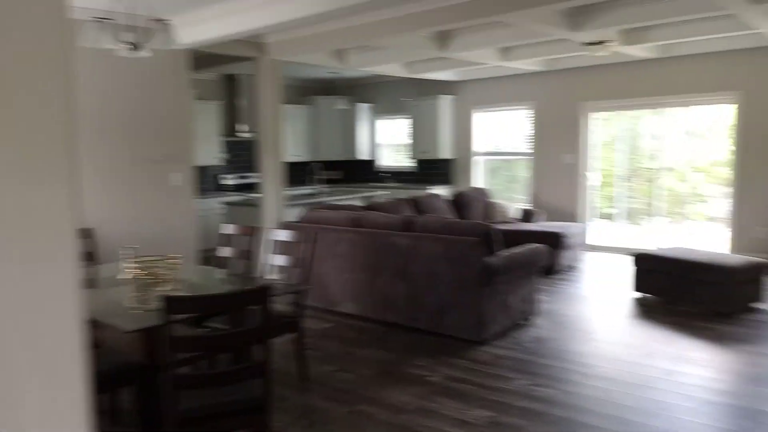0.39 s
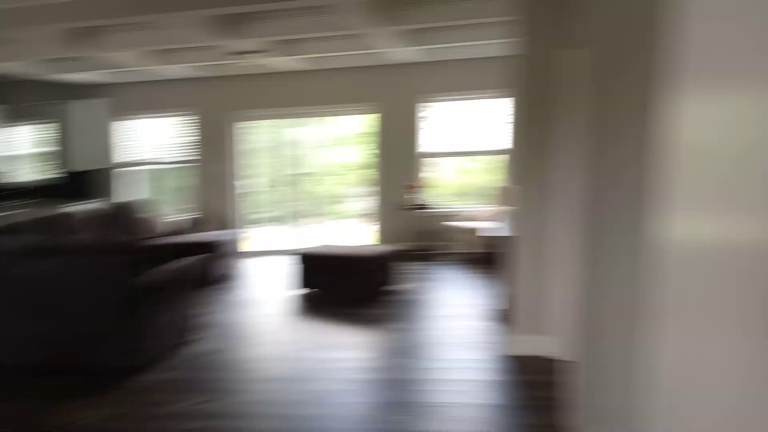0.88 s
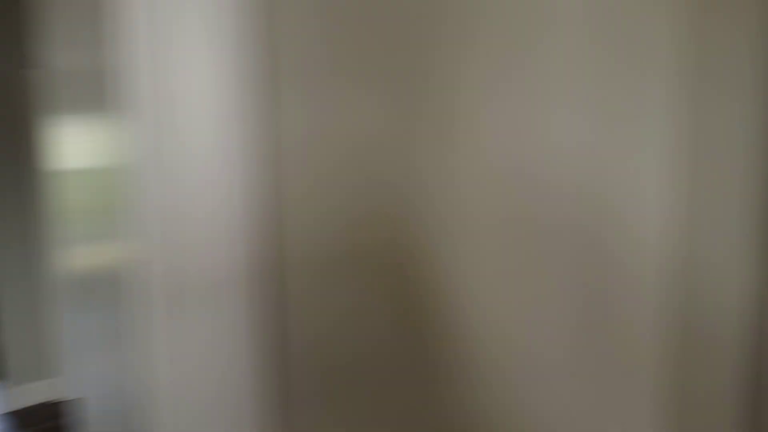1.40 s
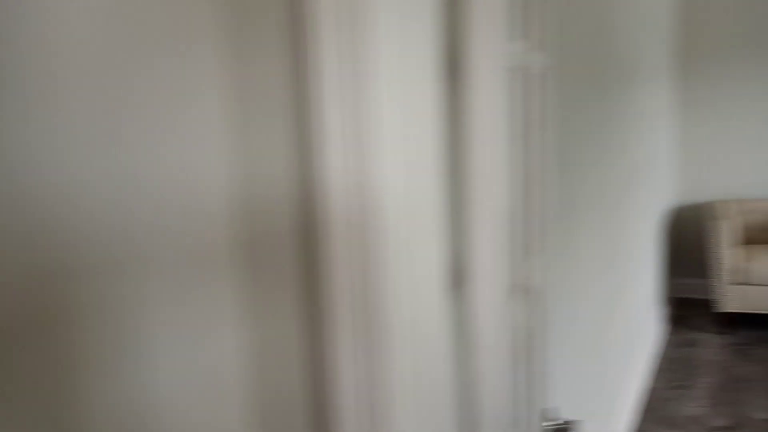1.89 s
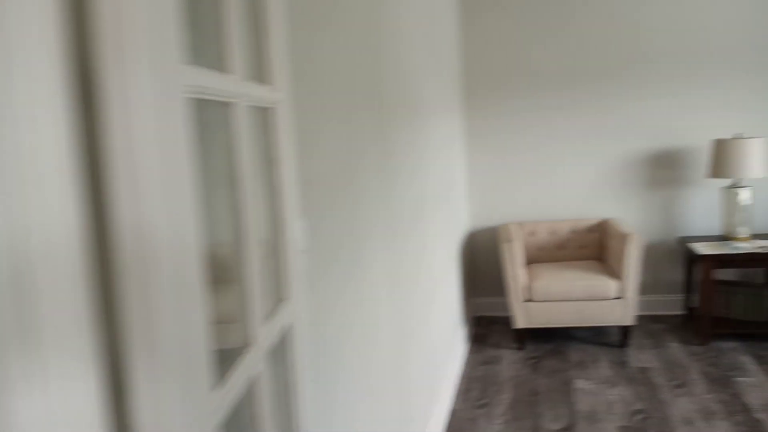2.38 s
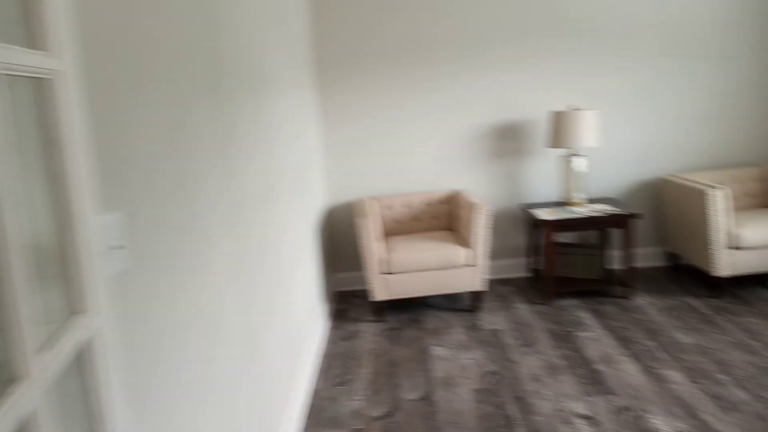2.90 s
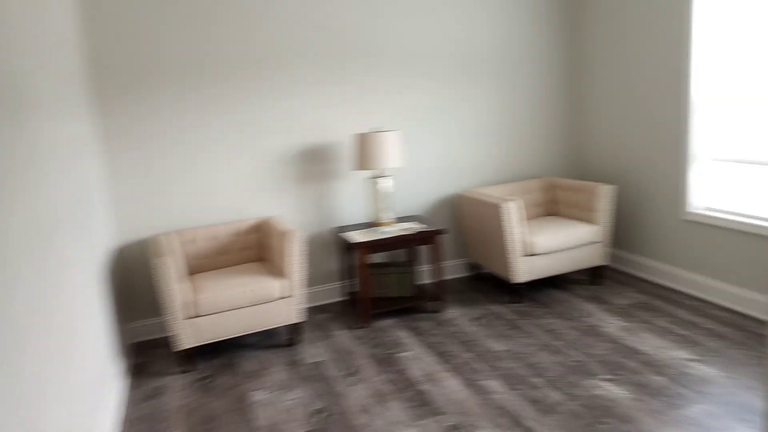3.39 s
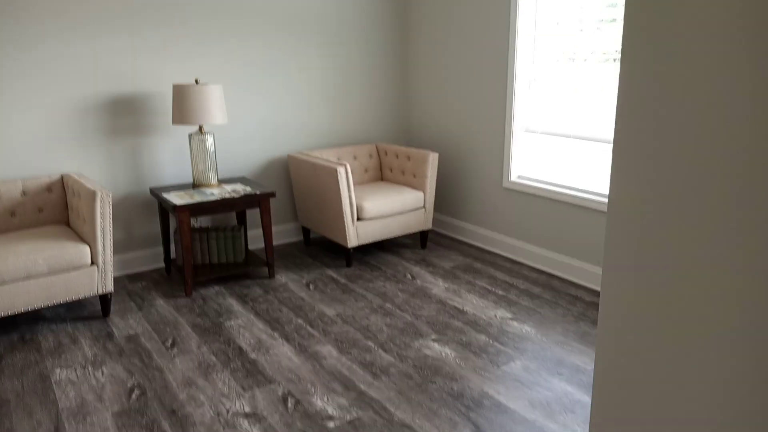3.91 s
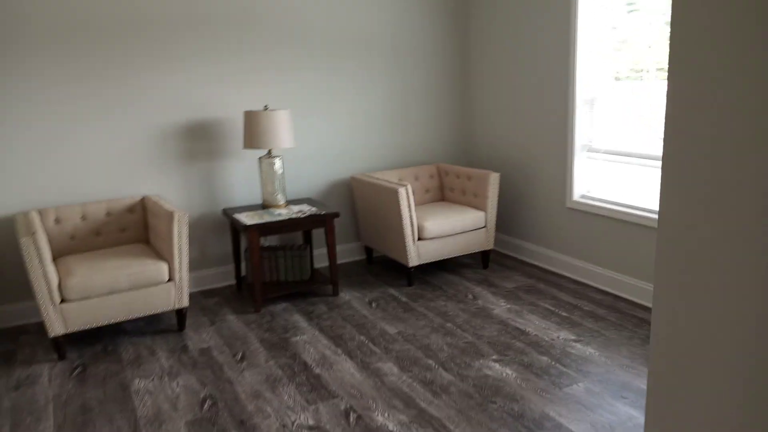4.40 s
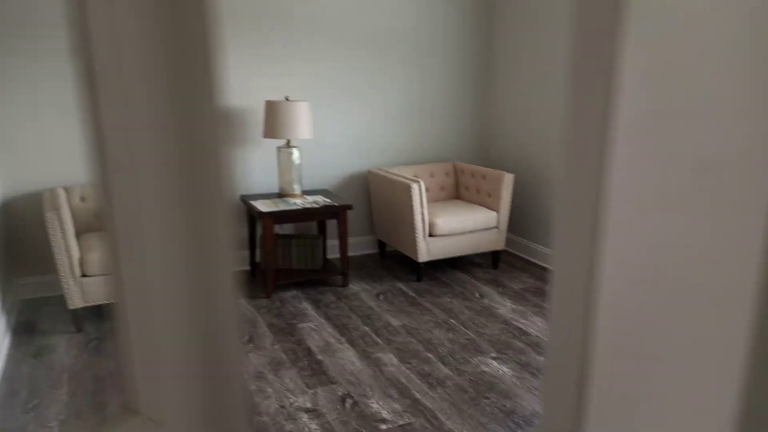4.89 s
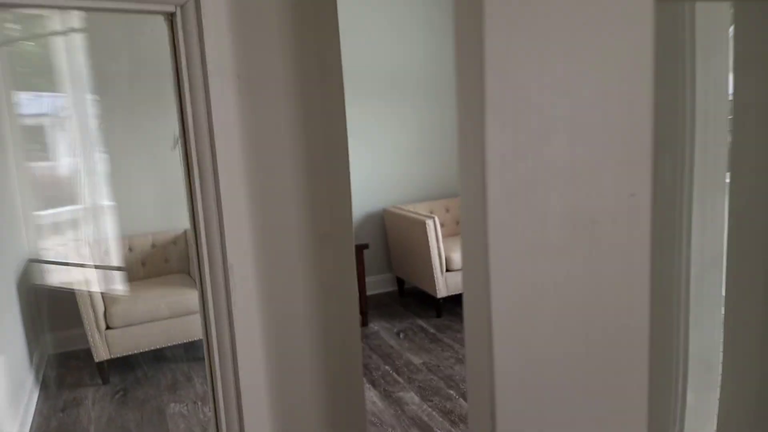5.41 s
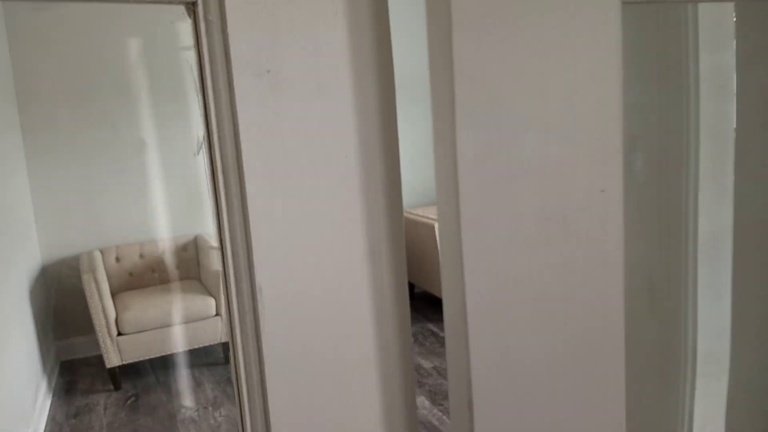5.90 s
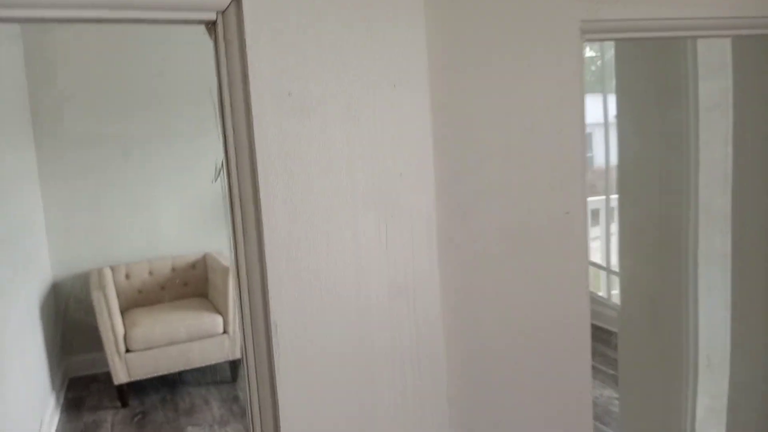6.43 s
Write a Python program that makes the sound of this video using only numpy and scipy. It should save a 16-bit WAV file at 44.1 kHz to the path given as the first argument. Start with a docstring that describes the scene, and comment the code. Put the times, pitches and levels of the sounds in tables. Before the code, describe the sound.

Close handheld microphone in a bare, slightly echoing house. Soft steps and scuffs on a hard floor with rustling clothes and a few bright key clinks. Then door hardware rattles in sharp ticks, with wooden thumps and heavier rustling, loudest around the middle and later part. It falls nearly silent, a hinge squeaks thinly, and the door knocks softly on its frame.

```python
"""Steps on a hard floor in a bare house, rustling clothes and soles, keys touching now and then; a light door
is pulled shut: its hardware ticks, its hinge squeaks, it knocks on the frame. Low hum and room air lie below.
Rustle and ticks are shaped noise; thuds and keys are decaying sines with noise; squeaks are unsteady sines;
groans and air are resonant noise; the door is a bank of resonances. A small microphone colours the treble."""
import sys
import numpy as np
from scipy import signal
from scipy.fft import rfft, irfft, next_fast_len
from scipy.io import wavfile

SR = 44100
rng = np.random.default_rng(int(sys.argv[2]) if len(sys.argv) > 2 else 0)


def wav_out(sig):
    """Save sig, one row per channel (or a flat mono array), as 16-bit PCM at SR to the path in sys.argv[1]."""
    wavfile.write(sys.argv[1], SR, np.round(np.clip(np.atleast_2d(sig).T, -1, 1) * 32767).astype(np.int16))


def attenuation_scalar(level_db):
    """Turn a level in dB into a linear amplitude multiplier (20 dB per decade)."""
    decades = np.asarray(level_db, float) / 20
    return 10 ** decades


N = 288414

# Single rubs of cloth and soles. Each row: time of the peak in seconds, peak in dB before the weight's share,
# 20 dB rise in seconds, 20 dB fall in seconds before the stretch, weight (extra body) in dB.
RUBS = [(.05, -46, 0.11, 0.17, -8), (.32, -53, 0.02, .3, -12), (.41, -55, 0.018, 0.34, -10.5),
        (.63, -59, 0.08, 0.5, -19), (.705, -46, 0.0097, 0.3, -6.5), (.872, -51.5, 0.022, 0.53, -27),
        (1.10, -51, 0.08, 0.42, -1), (1.37, -57, 0.024, -0.16, -23), (1.712, -56, 0.0095, 0.53, -13.5),
        (1.82, -61, 0.033, -0.18, -3), (2.45, -55, .12, 0.68, -7.5), (2.812, -53, 0.013, 0.23, -26),
        (3.05, -53, 0.1, 0.27, -24), (3.28, -56.5, 0.066, 0.63, -1), (3.39, -49, 0.23, 1, -5.5),
        (3.70, -40, 0.027, 0.26, -16), (3.75, -37, 0.023, 0.326, -5), (3.97, -46, 0.066, 0.22, -2),
        (4.20, -40.5, 0.12, 0.37, -13), (4.31, -40.5, 0.086, 0.3547, -6.5), (4.48, -46, 0.028, 0.2, 1),
        (4.55, -36.5, 0.039, 0.2929, -7), (4.84, -39, 0.038, 0.3979, -6), (4.93, -35, 0.16, 0.32, -9.5),
        (5.03, -38, 0.18, 0.1454, -3), (6.37, -63.5, 0.035, 0.22, 4)]
# Faint rustle under the rubs. Each row: time in seconds, level in dB before the weight's share, weight in dB.
SHUFFLE = [(0, -57.5, -4), (.3, -57, -2.5), (.6, -63, -24), (1.0, -75.5, -19), (1.35, -57, -6),
           (1.55, -69.5, -19), (2.1, -75.5, -5), (2.38, -67, -21), (2.9, -61, -11.5), (3.2, -65, 2),
           (3.65, -64.5, -2), (4.05, -55.5, -1), (4.75, -56, -3), (5.15, -61, 6), (5.25, -69, 10),
           (5.45, -89.5, 14), (6.05, -88.5, 9), (6.17, -88, 15.5), (6.3, -92, 4), (6.54, -79, -2)]
# Pitch strips of the rustle. Each row: low edge in Hz, high edge in Hz, gain in dB,
# share of the weight that it follows (ratio), stretch of the fall (ratio).
RUSTLE_STRIPS = [(370, 1190, -12.5, 0.21, 1.38), (1186, 2217, -0.5, 1.02, 0.75),
                 (2315, 5320, 0.5, 0.31, 0.61), (5430, 8600, -0.7, 0.023, 0.6),
                 (8820, 15150, -5.5, -.1, 0.57)]
# Rustle colour as the walker turns. Each row: time in seconds, gain of the middle strip in dB,
# gain of the top strip in dB.
RUSTLE_COLOUR = [(0, -0.3, 3), (.4, 0.5, 1), (.58, -2.5, 0), (.72, 2.5, 0.5), (.98, 1, -5), (1.1, 1, -0.5),
                 (1.4, 0.9, 0.5), (1.55, -7, -4.5), (1.8, 1.5, -2.5), (2.1, -6.5, 1.5), (2.5, 3.5, 2),
                 (3.0, 0, 1.5), (3.4, 0.5, -1), (3.65, 2, -3), (3.72, 1, 0), (4.0, 2, 3.5),
                 (4.45, 1.5, 0.1), (5.05, 0, 2), (5.22, 3.5, -4.5), (5.5, -1, 0.1), (6.54, 1.8, 1)]
# Heels, scuffs, knocks on boards and frame. Each row: start in seconds, peak in dB, pitch in Hz, T60 in seconds,
# spread of the noise to either side in octaves.
THUDS = [(.019, -36, 177, 0.17, 0.36), (.207, -44.5, 190, 0.12, 0.43), (0.329, -48, 260, 0.22, 0.43),
         (.701, -35, 250, 0.042, 0.54), (.711, -27.5, 190, 0.03, 0.55), (.709, -36, 526, 0.17, 0.32),
         (.765, -34.5, 248, 0.19, 0.8), (.80, -44, 176, 0.061, 0.43), (1.08, -46, 190, 0.22, 0.37),
         (1.16, -44.5, 236, 0.21, 0.24), (1.708, -61, 2900, 0.16, 0.15), (1.79, -61, 2024, 0.41, 0.082),
         (1.794, -45, 150, 0.12, 0.32), (2.268, -53, 795, 0.11, 0.6), (2.42, -51.5, 2030, 0.24, 0.09),
         (3.07, -45.5, 494, 0.3, 0.76), (3.418, -36, 1220, 0.035, 0.39), (3.717, -32, 1056, 0.28, 0.73),
         (4.298, -28, 1632, 0.44, 0.13), (4.322, -34, 990, 0.21, 0.19), (4.33, -33.5, 530, 0.16, 0.8),
         (4.482, -31.5, 381, 0.15, 0.46), (4.503, -30, 193, 0.2, 1.34), (4.54, -31, 330.5, 0.18, 1),
         (4.545, -32.5, 693, 0.19, 0.23), (4.555, -36, 1051, 0.3, 0.13), (5.815, -46.5, 1360, 0.051, 0.24),
         (5.817, -66, 2810, 0.11, 0.17), (5.818, -68, 4460, .12, 0.075)]
# Dry ticks of soles, folds and door hardware. Each row: start in seconds, peak in dB, centre in Hz,
# gain of the broad part in dB.
TICKS = [(.699, -36, 6960, -10), (1.7065, -53, 6800, -18), (2.268, -59, 1100, -6), (2.4204, -41, 2060, 14),
         (2.5227, -35, 6650, 14), (2.813, -37, 4900, -32), (3.071, -39, 2980, -17),
         (3.4176, -27, 1720, -7.5), (3.5029, -34, 3540, -16), (3.691, -25.5, 6200, -1.5),
         (3.6978, -24.5, 7190, -8), (3.7096, -22.5, 2880, -15.5), (3.732, -20.5, 5800, 1),
         (3.7406, -20.5, 2820, 0), (3.754, -20.5, 3000, -20.5), (3.7976, -24.5, 2940, 8),
         (3.8723, -26.5, 6640, -8.5), (3.9546, -30.5, 1850, -7), (4.1269, -19, 6160, 16),
         (4.1328, -19.5, 6200, -4.5), (4.1374, -42.5, 7160, -15), (4.2073, -29, 4170, -22),
         (4.471, -26.5, 4300, -18), (4.5052, -28, 6970, -6), (4.5183, -22.5, 2600, -1.5),
         (4.5237, -11.5, 7400, 4), (4.5343, -21, 3600, 3.5), (4.5414, -19.5, 7100, -4),
         (4.551, -25.5, 5470, -10), (4.5653, -28, 7000, -12), (4.576, -24, 6720, -1),
         (4.6754, -37.5, 6790, -20.5), (4.7578, -37.5, 6890, 8), (5.645, -62, 2370, -7),
         (5.816, -64, 2800, 2), (5.817, -58, 11000, -26), (5.895, -59.5, 11260, -10),
         (6.06, -56, 3880, -16), (6.134, -64, 6000, -8), (6.338, -58, 4700, -12), (6.359, -36.5, 2200, -25),
         (6.513, -41, 12700, -18), (6.5197, -40.5, 11000, -18)]
# Touches of the keys. Each row: start in seconds, peak in dB.
KEY_TOUCHES = [(0.4294, -44), (0.8674, -34.5), (0.8999, -32.5), (0.9114, -37), (0.9794, -66),
               (2.8105, -31.5), (2.8254, -48)]
# Ringing modes of the keys. Each row: pitch in Hz, mean level in dB, T60 in seconds.
KEY_MODES = [(5140, -18, .12), (6280, -12, .2), (7340, -12, .1), (10230, -14, .2), (10710, -3, .25),
             (11150, -13, .25), (13150, -8, .25), (13940, -5, .15), (15280, -4, .2)]
# Stick-slip squeaks of the hinge, one list each. Each row: time in seconds, mean pitch in Hz,
# level in dB before flutter.
SQUEAKS = [
    [(5.195, 9050, -70), (5.21, 8830, -66), (5.263, 9120, -74), (5.30, 8880, -66), (5.32, 8900, -68),
     (5.335, 8400, -80)],
    [(6.055, 8200, -66), (6.08, 9700, -76), (6.095, 11260, -62), (6.12, 11900, -58), (6.132, 13000, -59),
     (6.155, 13000, -61), (6.175, 11860, -53), (6.21, 11700, -75), (6.23, 11400, -90)],
    [(6.125, 11000, -75), (6.137, 11300, -59), (6.20, 11100, -63), (6.23, 11050, -94)],
    [(6.11, 10400, -84), (6.14, 10700, -86), (6.18, 9700, -74.5), (6.19, 9600, -85.5)],
]
# Drawn-out creaks of the door leaf. Each row: start in seconds, length in seconds, centre in Hz,
# width of each resonance in Hz, level in dB.
GROANS = [(4.81, .16, 656, 220, -48.5), (4.845, 0.18, 440, 118.6, -50.5), (4.97, .13, 610, 260, -49.5),
          (5.17, 0.13, 1413, 64.8, -57.5), (5.2, 0.37, 1770, 100.6, -74), (5.253, 0.1, 4470, 150, -83),
          (5.399, 0.18, 3245, 110, -79), (5.659, 0.26, 330, 35, -60.5), (6.05, 0.19, 2190, 99, -77),
          (6.106, 0.067, 1670, 108, -68), (6.084, 0.26, 1160, 80, -68.5)]
# Knocks of the door. Each row: start in seconds, peak in dB, contact brightness in Hz.
DOOR_HITS = [(6.3575, -36.5, 2500), (6.372, -37.5, 1300), (6.401, -41, 900), (6.43, -44, 794)]
# Modes of the door leaf. Each row: pitch in Hz, gain in dB before the contact's treble loss, T60 in seconds.
DOOR_MODES = [(680, -7, 0.07), (797, 5, 0.06), (900, 6, 0.042), (1045, 6.5, 0.035), (1276, 1, 0.063),
              (1550, -8, 0.07), (1890, -11, 0.12), (2310, -8, 0.044), (2410, -22, 0.17), (2530, -8, 0.19),
              (2900, -16, 0.13), (3720, -12, .15), (4490, -8, .12)]
# Slow level of the house, before waver. Each row: time in seconds, hum in dB, rumble in dB,
# low murmur in dB, upper murmur in dB.
HOUSE = [(0.0, -55, -42.5, -43, -42.5), (0.05, -64, -55, -66, -67), (0.24, -63, -69, -60.5, -63.5),
         (0.6, -63.5, -68, -60.5, -62.5), (0.8, -51, -52, -55, -72), (0.87, -64, -61, -56.5, -61.5),
         (1.18, -50.5, -63, -67.5, -64.5), (1.29, -63, -65, -62.5, -59), (1.35, -58, -67, -67.5, -65),
         (1.99, -58.5, -60.5, -63.5, -72), (2.29, -57, -79, -71.5, -65.5), (2.91, -57, -63, -73, -88),
         (3.22, -58.5, -65, -76, -65.5), (3.75, -61, -70, -110, -99), (3.77, -68, -92, -60, -84),
         (3.9, -62, -55.5, -67, -65.5), (4.19, -62, -75.5, -51.5, -49), (4.39, -55, -52, -59.5, -56.5),
         (4.66, -46.5, -63, -59, -59.5), (4.97, -52, -60.5, -72, -55.5), (5.14, -65, -53.5, -61, -72),
         (5.3, -70, -81, -66.5, -66), (6.21, -74.5, -75, -73, -75), (6.54, -84, -70.5, -68, -67.5)]
# Room resonances that the low murmur fills. Each row: centre in Hz, width in Hz, gain in dB.
LOW_TONES = [(190, 25, 0), (250, 17, -1), (326, 77.6, -4.5), (415, 31, -11.5)]
# Room resonances that the upper murmur fills. Each row: centre in Hz, width in Hz, gain in dB.
UPPER_TONES = [(566, 144, -4.5), (683, 74, 2), (898, 130, 3.5), (1044, 18, 4.5)]
# Microphone colour. Each row: frequency in Hz, gain in dB.
MIC = [(25, -22.5), (70, 1.5), (1500, -5), (2100, 0), (3000, -3), (5500, -0.5), (7200, 4.5), (7700, -3),
       (8200, -11.5), (9200, -9), (11000, 1), (13500, -13), (15200, 4), (16000, -10.5)]

TICK_T60_S = 0.015
ROOM_T60_S, WALL_CUT_HZ, ROOM_DB = 0.39, 3800, -21.5
HUM_HZ, RUMBLE_HZ = 136.5, 80
HUM_WAVER_DB, RUMBLE_WAVER_DB, MURMUR_WAVER_DB, WAVER_PER_S = 2, 3.0, 2.5, 3.5
LOW_STIR_DB, UPPER_STIR_DB = -11, -15.5   # murmur stirred by movement, re the movement's amplitude
DEEP_DB, HISS_DB = -71.5, -84.5
CUTOFF_HZ = 16300


def rms_one(x):
    """Scales to unit power."""
    return x / np.sqrt(np.mean(x ** 2) + 1e-20)


def in_time(rows):
    """Interpolates each column of a table sample by sample; the first column is time."""
    s, *columns = np.transpose(rows)
    return [np.interp(np.arange(N) / SR, s, c) for c in columns]


def band(x, low_hz, high_hz):
    """Gentle band-pass."""
    sos = signal.butter(2, [low_hz, min(high_hz, 0.45 * SR)], "band", fs=SR, output="sos")
    return signal.sosfilt(sos, x)


def resonance(x, hz, width_hz):
    """Two-pole resonance, about unit gain on top."""
    r = np.exp(-np.pi * width_hz / SR)
    zeros = np.array([1, 0, -1]) * (1 - r * r) / 2
    poles = [1, -2 * r * np.cos(2 * np.pi * hz / SR), r * r]
    return signal.lfilter(zeros, poles, x)


def drift(per_s):
    """Slow random wander of unit rms: noise through two equal low-pass poles."""
    r = np.exp(-2 * np.pi * per_s / SR)
    white = rng.standard_normal(N + SR)
    return rms_one(signal.lfilter([1], [1, -2 * r, r * r], white)[SR:])


def add(out, s, sound, peak_db):
    """Lays a short sound in at a given peak."""
    i = round(s * SR)
    scaled = attenuation_scalar(peak_db) * sound / np.abs(sound).max()
    out[i:i + len(sound)] += scaled[:N - i]


def movement(weight_share, stretch):
    """Amplitude of the rubbing: powers of shuffle and rubs add; each rub rises and falls exponentially."""
    t = np.arange(N) / SR
    level_db, weight_db = in_time(SHUFFLE)
    power = attenuation_scalar(level_db + weight_share * weight_db) ** 2
    for s, peak_db, rise_s, fall_s, rub_weight_db in RUBS:
        before = (s - t) / max(rise_s, 0.002)
        after = (t - s) / max(stretch * fall_s, 0.02)
        away = np.maximum(before, after)   # in steps of 20 dB
        near = away < 4
        power[near] += attenuation_scalar(peak_db + weight_share * rub_weight_db - 20 * away[near]) ** 2
    return np.sqrt(power)


def rustle(grain_db, patchy_db):
    """Fibres slip in a dense rain of uneven grains; each narrow strip of pitch swells and fades on its own."""
    out = 0
    middle_db, treble_db = in_time(RUSTLE_COLOUR)
    colours_db = [0, 0, middle_db, 0, treble_db]
    for (low_hz, high_hz, db, weight_share, stretch), colour_db in zip(RUSTLE_STRIPS, colours_db):
        edges_hz = np.geomspace(low_hz, high_hz, 6)
        uneven = np.minimum(rng.exponential(1, (2, N)), 3)
        grains = rng.standard_normal((2, N)) * attenuation_scalar(grain_db * uneven)
        strips = 0
        for k in range(5):
            patches = attenuation_scalar(patchy_db * drift(11.7))
            strips = strips + band(grains[k % 2], *edges_hz[k:k + 2]) * patches
        out = out + rms_one(strips) * attenuation_scalar(db + colour_db) * movement(weight_share, stretch)
    return out


def thuds():
    """A soft push rings the board at its pitch, over a burst of noise from the boards around."""
    out, t = np.zeros(N), np.arange(SR // 3) / SR
    for s, peak_db, hz, t60_s, octaves in THUDS:
        fade = attenuation_scalar(-60 * t / max(t60_s, 0.01)) * (1 - np.exp(-t * hz * 0.5))
        spread = 2 ** max(octaves, 0.05)
        boards = rms_one(band(rng.standard_normal(len(t)), hz / spread, hz * spread))
        ring = np.sin(2 * np.pi * hz * t)
        add(out, s, fade * (ring + 1.33 * boards), peak_db)
    return out


def ticks():
    """A puff of noise swells in about a millisecond and dies fast, part broad, part gathered round its centre."""
    out, t = np.zeros(N), np.arange(SR // 8) / SR
    envelope = np.minimum(t / 0.0011, 1) * attenuation_scalar(-60 * t / TICK_T60_S)
    for s, peak_db, hz, broad_db in TICKS:
        puff = rng.standard_normal(len(t)) * envelope
        broad = attenuation_scalar(broad_db) * band(puff, 0.34 * hz, 3.66 * hz)
        ring = resonance(resonance(puff, hz, 0.5 * hz), hz, 0.5 * hz)
        add(out, s, broad + ring, peak_db)
    return out


def keys():
    """A touch cracks and strikes every mode with a strength of its own; the loose bunch makes the ring flutter."""
    out, t = np.zeros(N), np.arange(SR // 2) / SR
    hz, level_db, t60_s = np.transpose(KEY_MODES)[:, :, None]
    flutter = attenuation_scalar(3.5 * np.array([drift(50)[:len(t)] for mode in KEY_MODES]))
    for s, peak_db in KEY_TOUCHES:
        luck_db = 2.7 * rng.standard_normal((len(KEY_MODES), 1))
        fade = attenuation_scalar(level_db + luck_db - 60 * t / t60_s)
        rings = np.sum(flutter * fade * np.sin(2 * np.pi * hz * t), axis=0)
        crack = band(rng.standard_normal(len(t)), 2100, 21000) * attenuation_scalar(6.0 - 60 * t / 0.051)
        add(out, s, rings + crack, peak_db)
    return out


def hinge(waver_hz, flutter_db):
    """Stick-slip gives thin whistles, shaky in pitch and strength; the leaf gives narrow rough groans."""
    out, t = 0, np.arange(N) / SR
    shake_hz, flutter = waver_hz * drift(250), attenuation_scalar(flutter_db * drift(90))
    for rows in SQUEAKS:
        hz, level_db = in_time(rows)
        sounding = (t > rows[0][0]) & (t < rows[-1][0])
        whistle = np.sin(2 * np.pi * np.cumsum(hz + shake_hz) / SR)
        out = out + sounding * attenuation_scalar(level_db) * flutter * whistle
    white = rng.standard_normal(N)
    for s, length_s, hz, width_hz, level_db in GROANS:
        arch = np.sin(np.pi * np.clip((t - s) / length_s, 0, 1))
        swell = np.sqrt(np.clip(arch, 0, 1))
        rough = rms_one(resonance(resonance(white, hz, width_hz), hz, width_hz))
        out = out + attenuation_scalar(level_db) * swell * rough
    return out


def door():
    """A knock shakes the leaf for a moment; a soft contact leaves the high modes weak."""
    out, t = np.zeros(N), np.arange(SR // 2) / SR
    for s, peak_db, bright_hz in DOOR_HITS:
        shake = 7.5 * (t == 0) + rng.standard_normal(len(t)) * attenuation_scalar(-60 * t / 0.14)
        modes = 0
        for hz, db, t60_s in DOOR_MODES:
            gain = attenuation_scalar(db) / (1 + (hz / bright_hz) ** 2) * t60_s
            width_hz = np.log(1000) / (np.pi * t60_s)
            modes = modes + gain * resonance(shake, hz, width_hz)
        add(out, s, band(modes, 320, 2 * bright_hz), peak_db)
    return out


def room(x):
    """Echoes of twelve parallel feedback delays, duller on every round."""
    size = next_fast_len(N + SR)
    turn = np.exp(-2j * np.pi * np.arange(size // 2 + 1) / size)   # one-sample delay
    dull = np.exp(-2 * np.pi * WALL_CUT_HZ / SR)
    wall = (1 - dull) / (1 - dull * turn)
    echoes = 0
    for k, lag in enumerate((rng.uniform(0.012, 0.045, 12) * SR).astype(int)):
        loop = attenuation_scalar(-60 * lag / SR / ROOM_T60_S) * wall * turn ** lag
        echoes = echoes + loop / (1 - loop) * (-1) ** k
    return irfft(rfft(x, size) * echoes, size)[:N]


def murmur(tones):
    """Noise of unit rms gathered in a few resonances, dark between them."""
    white = rng.standard_normal(N)
    total = 0
    for hz, width_hz, db in tones:
        total = total + attenuation_scalar(db) * resonance(resonance(white, hz, width_hz), hz, 2 * width_hz)
    return rms_one(total)


def house():
    """Wavering narrow-band hum and rumble, room resonances stirred by movement, deep noise and a thin hiss."""
    hum_db, rumble_db, low_db, upper_db = in_time(HOUSE)
    stir = movement(weight_share=0.96, stretch=1.4)
    out = attenuation_scalar(hum_db + HUM_WAVER_DB * drift(WAVER_PER_S)) * murmur([(HUM_HZ, 20, 0)])
    out += attenuation_scalar(rumble_db + RUMBLE_WAVER_DB * drift(WAVER_PER_S)) * murmur([(RUMBLE_HZ, 35, 0)])
    for db, stir_db, tones in [(low_db, LOW_STIR_DB, LOW_TONES), (upper_db, UPPER_STIR_DB, UPPER_TONES)]:
        steady = attenuation_scalar(db + MURMUR_WAVER_DB * drift(WAVER_PER_S))
        out += np.hypot(steady, attenuation_scalar(stir_db) * stir) * murmur(tones)
    deep = attenuation_scalar(DEEP_DB) * rms_one(band(rng.standard_normal(N), 14.1, 41))
    hiss = attenuation_scalar(HISS_DB) * rng.standard_normal(N)
    return out + deep + hiss


def scene():
    """Near sounds with their room, over the house."""
    near = rustle(grain_db=2.5, patchy_db=2.0) + thuds() + ticks() + keys()
    near = near + hinge(waver_hz=150, flutter_db=3.5) + door()
    return (near + attenuation_scalar(ROOM_DB) * room(near) + house())[None]


def top_cut(x):
    """Nothing passes above the cut-off."""
    return signal.sosfilt(signal.butter(12, 16950, fs=SR, output="sos"), x)


def record(dry):
    """The microphone's colour, then a steep cut at the top."""
    size = next_fast_len(N + SR // 4)
    hz, db = np.transpose(MIC)
    bins_hz = np.arange(size // 2 + 1) * SR / size
    colour = attenuation_scalar(np.interp(np.log(bins_hz + 1), np.log(hz), db))
    coloured = irfft(rfft(dry, size) * colour, size)[:, :N]
    cut = signal.cheby2(14, 45, CUTOFF_HZ, fs=SR, output="sos")
    mix = signal.sosfilt(cut, coloured)
    return top_cut(mix)


dry = scene()
out = record(dry)
wav_out(out)
```